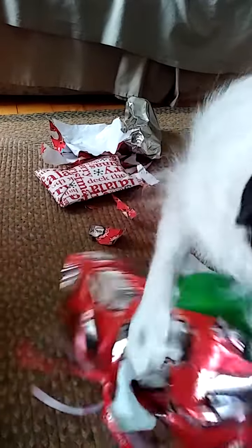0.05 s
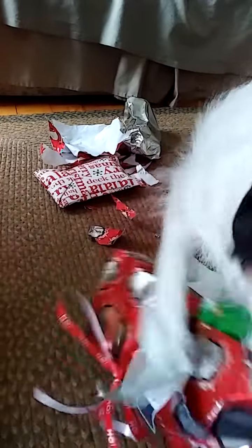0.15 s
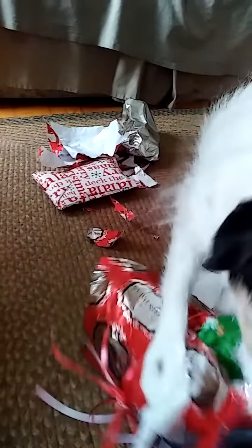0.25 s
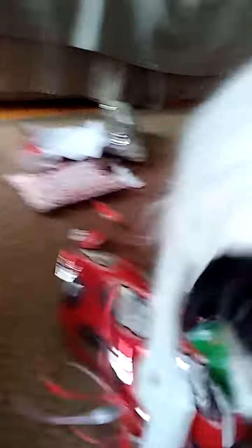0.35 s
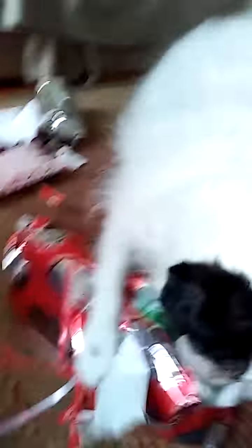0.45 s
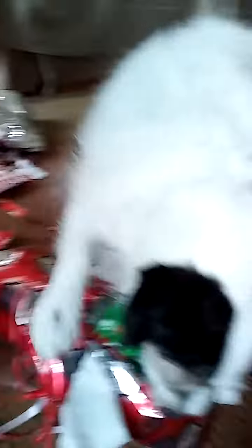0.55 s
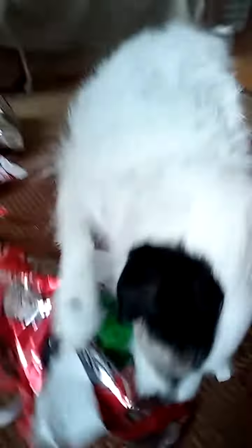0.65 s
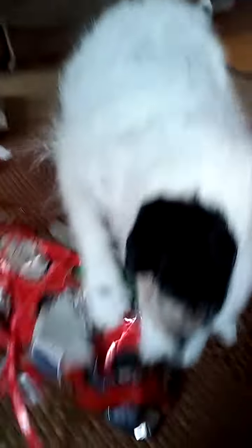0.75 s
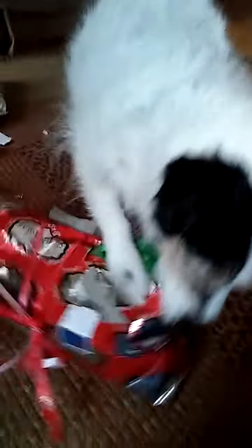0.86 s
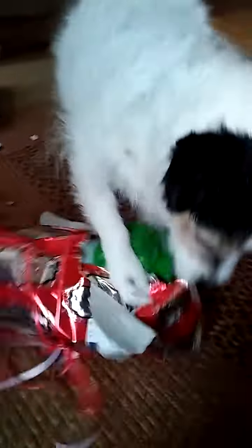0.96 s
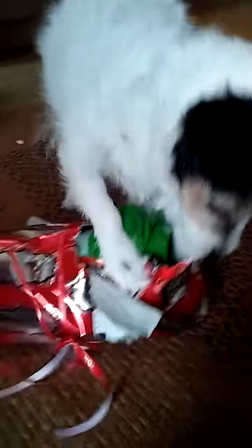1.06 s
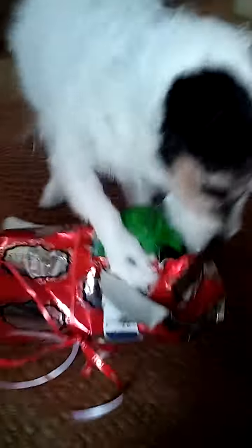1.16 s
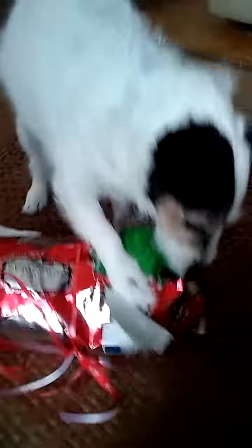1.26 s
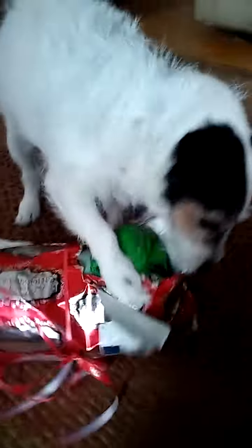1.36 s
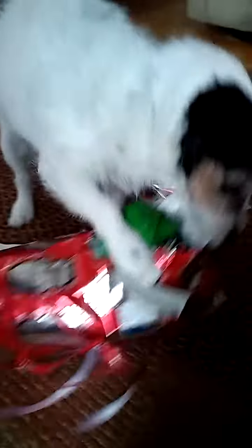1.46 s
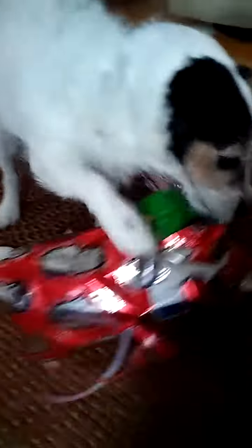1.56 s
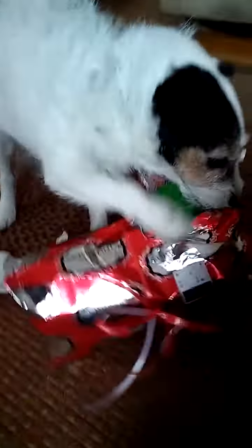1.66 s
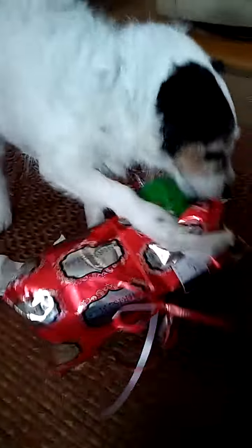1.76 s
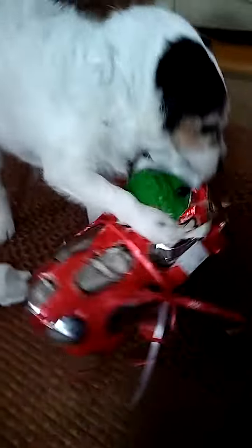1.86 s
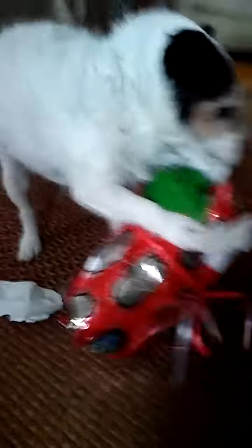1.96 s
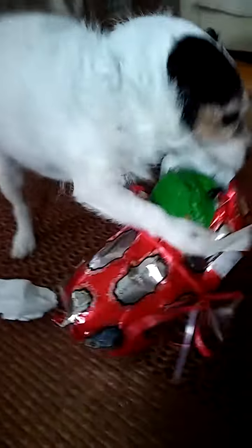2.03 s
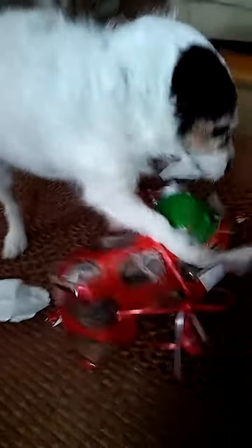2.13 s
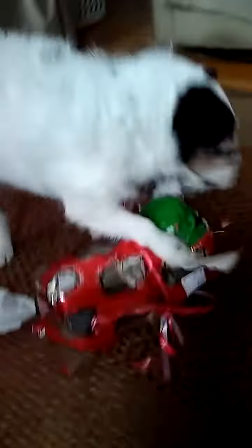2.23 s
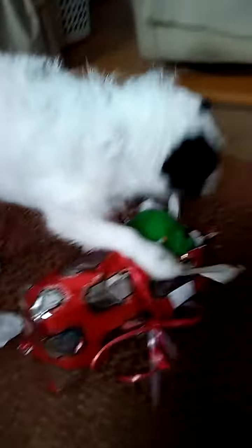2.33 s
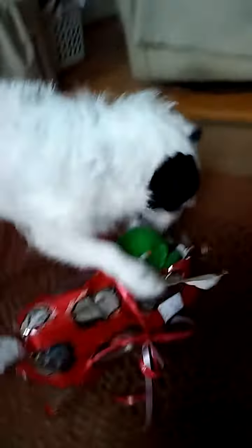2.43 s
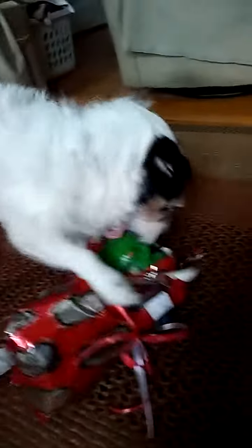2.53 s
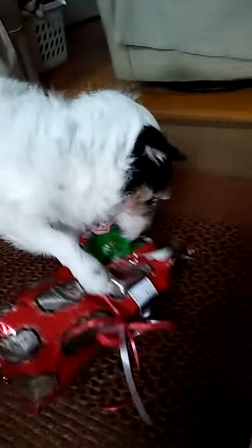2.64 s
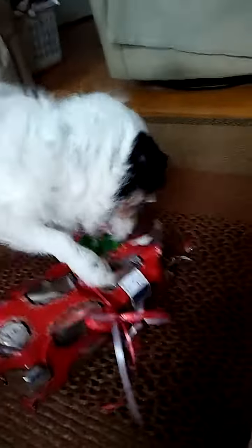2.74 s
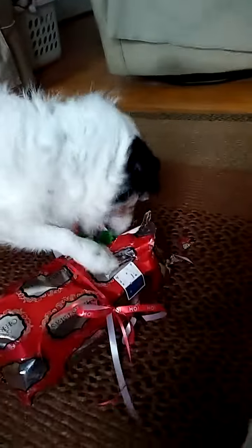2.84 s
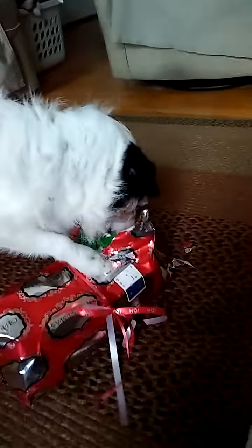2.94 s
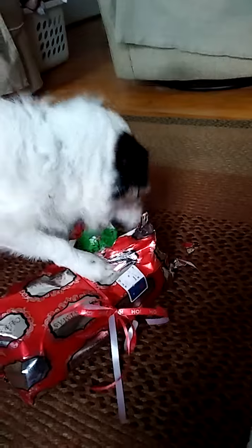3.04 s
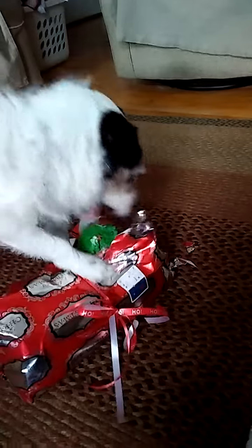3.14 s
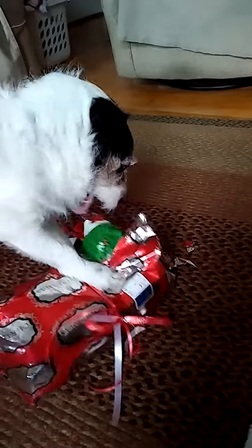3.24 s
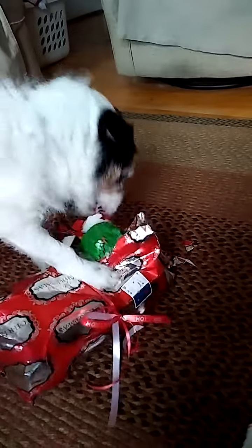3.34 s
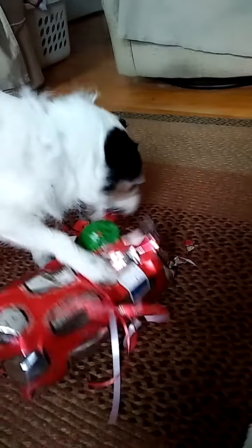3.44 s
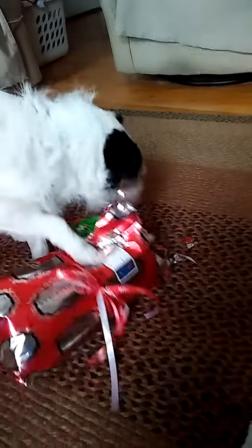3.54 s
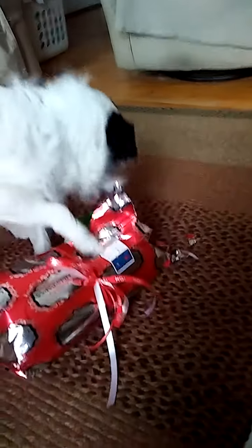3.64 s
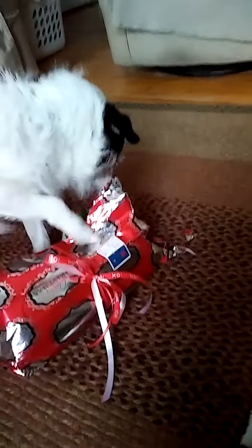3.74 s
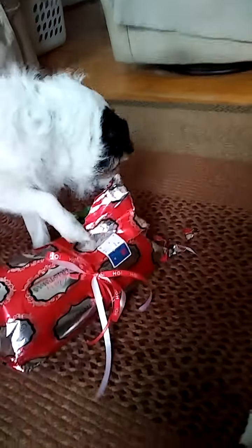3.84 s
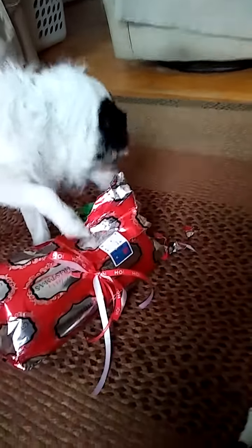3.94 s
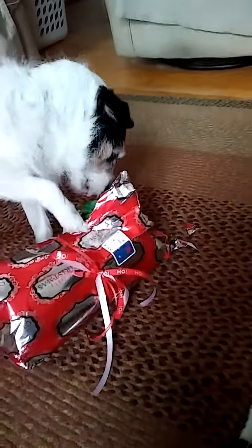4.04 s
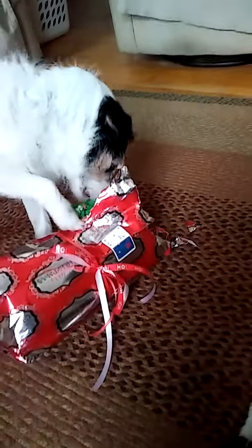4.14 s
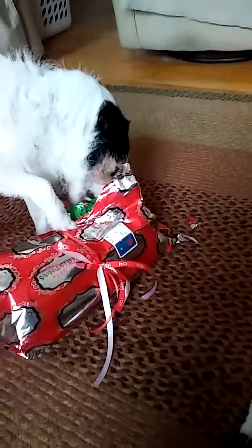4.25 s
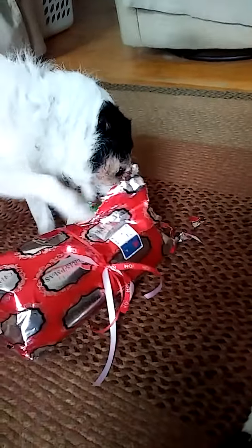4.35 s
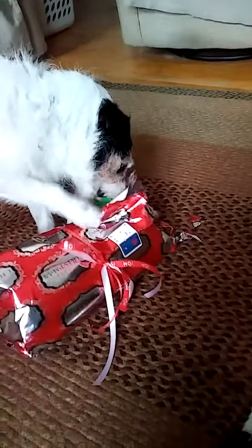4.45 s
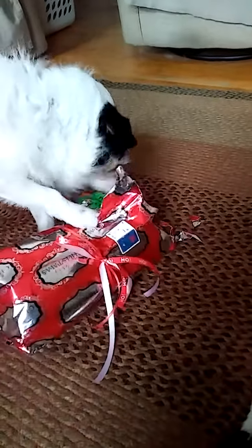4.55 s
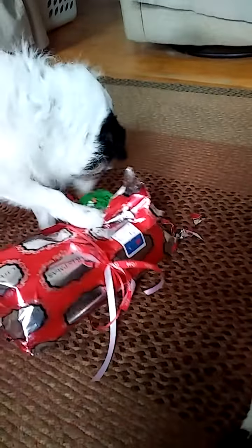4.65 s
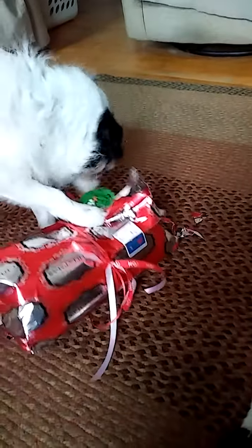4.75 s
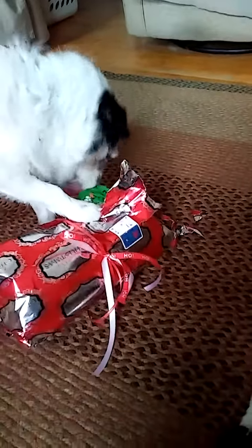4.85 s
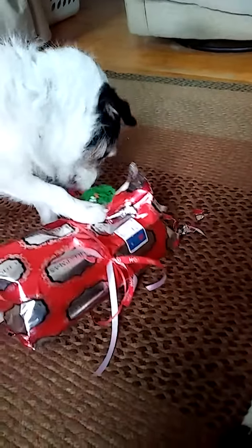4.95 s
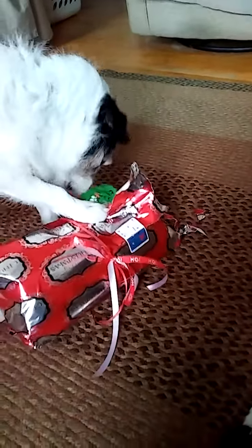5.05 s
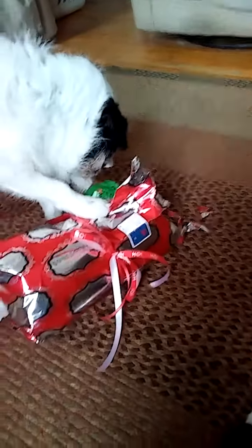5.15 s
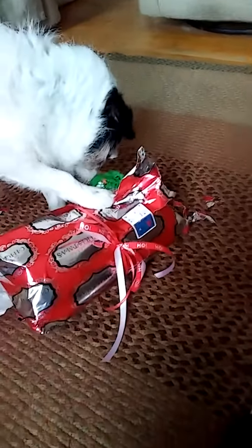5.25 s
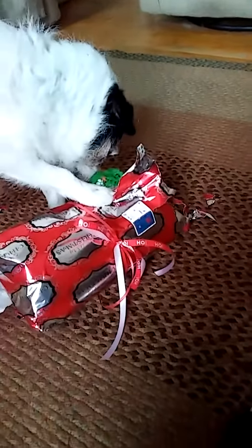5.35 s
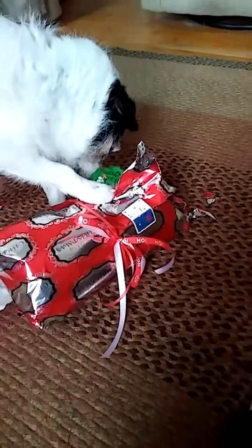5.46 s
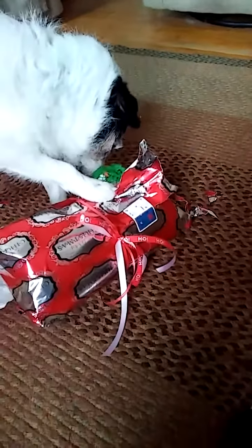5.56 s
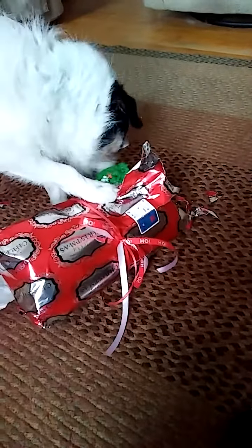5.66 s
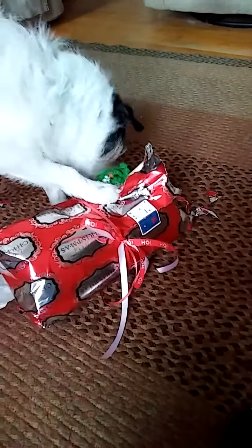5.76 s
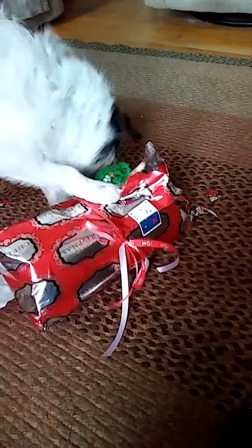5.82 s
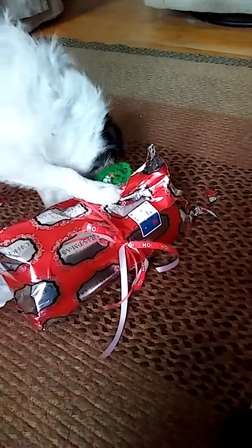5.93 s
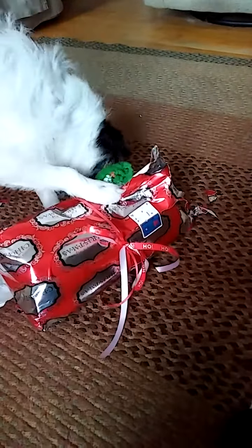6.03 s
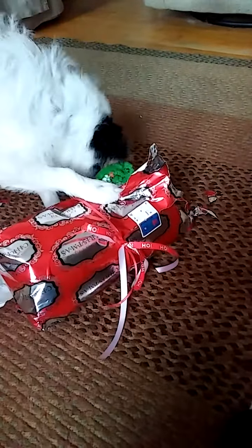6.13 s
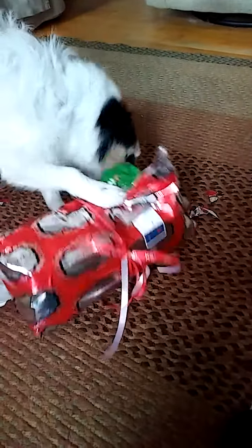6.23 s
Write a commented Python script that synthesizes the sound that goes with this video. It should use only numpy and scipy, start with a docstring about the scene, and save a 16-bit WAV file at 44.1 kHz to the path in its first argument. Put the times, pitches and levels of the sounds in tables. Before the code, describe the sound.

Close by, a small dog pulls at foil wrapping on a carpeted floor. Dense, sharp snaps and crinkles come in quick jerks, loudest in the first half second, with dull paw bumps underneath. Spells thin out, flare again just after two seconds, then give way to small, slightly higher nibbling crackles, faint brushing and quiet gaps. A furnished living room adds a short reverberation over soft air and low hum.

```python
"""Small dog unwrapping a present

A small dog paws and tugs at a present wrapped in foil paper on a living-room carpet, then noses and nibbles.
Creases snap as damped swings over a bed of crinkling, which is random clicks filtered by paper and parcel.
Thuds are decaying floor modes; short strokes and a sliding swish are crackle and noise shaped in time.
A furnished room answers with scatter and decaying echoes; soft mains hum and room air lie beneath.
"""
import sys
import numpy as np
from scipy import signal
from scipy.fft import rfft, irfft, next_fast_len
from scipy.io import wavfile
from scipy.ndimage import uniform_filter1d, minimum_filter1d

SR = 44100
rng = np.random.default_rng(int(sys.argv[2]) if len(sys.argv) > 2 else 0)


def dump_mix(stems):
    """Bounce the given channels to the path in sys.argv[1] as a 16-bit WAV at rate SR."""
    frames = np.atleast_2d(stems).T  # one column per channel
    limited = np.clip(frames, -1, 1)  # hard clip at full scale
    pcm = np.round(limited * 32767).astype(np.int16)
    wavfile.write(sys.argv[1], SR, pcm)


N = 277375

# Dog pawing and tugging at loose sheets; all levels relative:
# start_s, hold_s, level_db, extra_foil_fizz_db, weight_on_parcel_db
PULLS = [(0.0, .125, -24.5, 0, -2), (.158, .13, -28.5, 0.5, -5.5), (.305, .03, -20, 3.5, -15),
         (.345, .05, -27.5, -17, -5.5), (.475, .075, -27, 0.5, 3.5), (.56, .1, -44, -2, -5.5),
         (.67, .22, -43, -4, 4), (.899, .03, -28.5, -10.5, 4.5), (.94, .15, -35.5, -2, 6.5),
         (1.103, .035, -31, -4.5, 2.5), (1.17, .12, -45.5, -0.5, -0.5), (1.305, 0.085, -41.5, -4, 2),
         (1.42, .22, -52.5, 2, 11.5), (1.65, 0.092, -43, 1, 1.5), (1.77, .17, -46.5, -14, -3.5),
         (1.803, .02, -36, -2, 0.5), (1.95, .065, -37, 0, -0.5), (2.02, .1, -36.5, -1.5, 10),
         (2.13, .07, -44, 0.5, 7), (2.195, .068, -23.5, 5.5, 9), (2.3, 0.098, -44, 5.5, -5.5)]
# Dog nibbling a tight corner; all levels relative:
# start_s, hold_s, level_db, extra_foil_fizz_db, weight_on_parcel_db
NIBBLES = [(3.029, 0.029, -44, -5.5, -1.5), (3.113, 0.028, -43.5, 5.5, -14), (3.2, 0.1, -58.5, 2, -8),
           (3.297, 0.049, -45, -8.5, 5.5), (3.47, 0.18, -56, -0.5, -4), (3.6, 0.092, -49.5, -7, 2),
           (3.73, 0.25, -61, 5, -5), (4.578, .058, -39, -3.5, -2), (4.68, 0.031, -65, 1.5, 18),
           (6.198, 0.055, -55.5, -2, 7)]


def from_db(db):
    """Decibels to amplitude gain, twenty to the decade."""
    return 10 ** (np.asarray(db) / 20)


def rms_one(x):
    """Normalise the mean power, so that the rms is 1."""
    return x / np.sqrt(np.mean(x ** 2) + 1e-20)


def at_hz(points, hz):
    """Interpolate a spectrum or decay curve on a logarithmic frequency axis."""
    points = np.array(points)
    return np.interp(np.log(hz), np.log(points[:, 0]), points[:, 1])


def drift(rate):
    """Band-limited chance: random knots, `rate` a second, joined by straight lines; rms 1."""
    knots = rng.standard_normal(4000)
    return rms_one(np.interp(np.arange(N) / SR * rate, np.arange(len(knots)), knots))


def colour(x, spectrum):
    """Minimum-phase filtering: the cepstrum folded to positive times makes the response causal; rms 1."""
    size = next_fast_len(N + 8192, real=True)
    hz = np.maximum(np.fft.rfftfreq(size, 1 / SR), 1)
    octaves_out = np.abs(np.log2(hz / np.clip(hz, spectrum[0][0], spectrum[-1][0])))
    # past its ends the spectrum falls 30 dB an octave, by 50 dB at most
    level_db = at_hz(spectrum, hz) - np.minimum(30 * octaves_out, 50)
    cepstrum = irfft(np.log(from_db(level_db)), size)
    cepstrum[1:size // 2] *= 2
    cepstrum[size // 2 + 1:] = 0
    response = np.exp(rfft(cepstrum))
    return rms_one(irfft(rfft(x, size) * response, size)[:N])


def grains(per_s, spread_db):
    """Impulse noise: tiny buckles of uneven size and random sign at random moments; mean power 1."""
    chance, size = rng.random((2, N), dtype=np.float32)
    clicks = np.zeros(N)
    at = np.flatnonzero(chance < per_s / SR)
    signed = 2 * size[at] - 1
    rarity = -np.log(np.maximum(np.abs(signed), .05))  # large sizes are rare, and bounded
    clicks[at] = np.sign(signed) * from_db(spread_db * rarity)
    return rms_one(clicks)


def background():
    """Stationary noise and harmonics: still room air and mains hum."""
    # room air, relative level: pitch_hz, level_db
    room_tone = [(25, -21), (55, -12.5), (100, -6), (200, -1), (400, -4.5), (700, -8), (1200, -15),
                 (2200, -12), (3200, -16.5), (4500, -25.5), (6500, -25.5), (9000, -27), (12500, -32.5),
                 (15500, -27.5)]
    # sines of the mains hum, rms level: pitch_hz, level_db
    mains_hum = [(60, -78), (120, -74), (180, -83), (300, -76)]
    room_tone_db = -63
    t = np.arange(N) / SR
    hum = sum(from_db(db) * np.sqrt(2) * np.sin(2 * np.pi * (hz * t + rng.random()))
              for hz, db in mains_hum)
    return hum + from_db(room_tone_db) * colour(rng.standard_normal(N), room_tone)


def crackle(broad_share=.65, patchy_db=5.0, patches_per_s=55, count=26):
    """Crackling noise: bands of creases rise and fall independently; some buckles click at all pitches."""
    broad = grains(per_s=420, spread_db=5)
    out = 0
    edges = np.geomspace(300, 16500, count + 1)
    for k, (low, high) in enumerate(zip(edges, edges[1:])):
        activity = from_db(patchy_db * drift(patches_per_s))
        creases = grains(per_s=170 + 0.056 * low, spread_db=3.0) * activity
        limits = [low, high] if k else [40, high]  # the first band also holds the bass
        band = signal.butter(2, limits, "band", fs=SR, output="sos")
        out = out + signal.sosfilt(band, rms_one(creases) + 1e-18)
    return out + broad_share * broad


def spell_gains(spells, scuff_share=0.45):
    """Addition of powers: overlapping spells give the gains of crinkle, fizz, scuff and body."""
    # each pull or nibble builds, sags while held, then dies away
    attack_s, sag_db_per_s, release_db_per_s = 0.0057, 16.5, 259
    power, t = np.zeros((4, N + SR)), np.arange(SR) / SR
    for s, hold_s, level_db, foil_db, weight_db in spells:
        fall_db = sag_db_per_s * t + release_db_per_s * np.maximum(t - hold_s, 0)
        swell = np.minimum(t / attack_s, 1) * from_db(level_db - fall_db)
        # weight on the parcel brings out scuff and body
        layers = from_db([0, foil_db, scuff_share * weight_db, weight_db])
        start = max(int(s * SR), 0)
        power[:, start:start + SR] += np.outer(layers, swell) ** 2
    return np.sqrt(power[:, :N])


def handling(spells, buckles, crinkle_shape, fizz_shape, crinkle_db, fizz_db, scuff_db, body_db):
    """Source and filter: crackle sounds in paper, foil skin, scuffed wrapping and the hollow parcel."""
    # scuffed wrapping, relative level: pitch_hz, level_db
    scuff_shape = [(380, -19), (500, -7), (690, 3.5), (800, 4.5), (1050, 3), (1400, 1.5), (1700, -9.5),
                   (2100, -17.5)]
    # hollow parcel, relative level: pitch_hz, level_db
    body_shape = [(70, -18.5), (130, -10), (185, -.5), (250, 0.5), (310, 3.5), (365, 4), (440, -8.5),
                  (560, -23)]
    shapes = (crinkle_shape, fizz_shape, scuff_shape, body_shape)
    trims = from_db([crinkle_db, fizz_db, scuff_db, body_db])
    return sum(gain * trim * colour(buckles, shape)
               for gain, trim, shape in zip(spell_gains(spells), trims, shapes))


def pop(t, hz, rise_s, phase):
    """Heavily damped oscillation: the envelope builds to height 1 and is gone within a few cycles."""
    u = np.maximum(t, 0) / rise_s
    envelope = (u * np.exp(1 - u)) ** 3
    return envelope * np.sin(2 * np.pi * (hz * t + phase))


def buckle(t, flap_db, flap_hz, edge_db, edge_hz, chance, flap_rise_s=0.00066, edge_rise_s=0.00058,
           rim_hz=6300, rim_db=-10, sheet_hz=950, sheet_db=-25, crack_hz=7500, crack_db=-21,
           crack_rise_s=0.00014, tick_hz=13000, tick_db=-33, tick_rise_s=.00015):
    """Snap-through buckling: flap and sheet swing; the stiff edge rings higher, with a crack and fine tick."""
    flap = pop(t, flap_hz, flap_rise_s, chance[0])
    flap += from_db(sheet_db) * pop(t, sheet_hz, flap_rise_s, chance[1])
    edge = pop(t, edge_hz, edge_rise_s, chance[2])
    edge += from_db(rim_db) * pop(t, rim_hz, edge_rise_s, chance[3])
    edge += from_db(crack_db) * pop(t, crack_hz, crack_rise_s, chance[4])
    edge += from_db(tick_db) * pop(t, tick_hz, tick_rise_s, chance[4])
    return from_db(flap_db) * flap + from_db(edge_db) * edge


def snaps(rows, flap_db=-1, edge_db=-2.5, chain_db=-9, chain_s=.006, lead_s=.0018, hard_pull_db=-16,
          pull_db=4, pitch_scatter=0.2, usual_flap_hz=2250, usual_edge_hz=4900, edge_follows=0.74, count=3):
    """Coupled buckling: weaker neighbours surround each snap, relatively stronger around louder snaps."""
    out = np.zeros(N + 900)
    t = np.arange(900) / SR - .004  # leaves room for neighbours that go first
    for (s, level_db, hz, bright_db), chance in zip(rows, rng.random((len(rows), count + 1, 7))):
        # a stiffer flap has a higher edge
        edge_hz = usual_edge_hz * (hz / usual_flap_hz) ** edge_follows
        flap_level_db, edge_level_db = level_db + flap_db, bright_db + edge_db
        chain = buckle(t, flap_level_db, hz, edge_level_db, edge_hz, chance[0])
        hardness = np.tanh((max(level_db, bright_db) - hard_pull_db) / 10)
        weaker_db = chain_db + pull_db * hardness
        for *phases, late, stiff in chance[1:]:
            delay = chain_s * late - lead_s
            detune = 1 + pitch_scatter * (2 * stiff - 1)
            neighbour = buckle(t - delay, flap_level_db, hz * detune, edge_level_db, edge_hz * detune, phases)
            chain += from_db(weaker_db - 6 * late) * neighbour
        start = int(np.clip((s + t[0]) * SR, 0, N - 1))
        out[start:start + len(t)] += chain
    return out[:N]


def small_snaps(over_db=9.5, idle_db=-58, crowding=.45, scatter_db=1.0, foil_db=-8, loose_hz=2150,
                tight_hz=2650, pitch_scatter=.16, count=330):
    """Activity-driven point process: rows of lesser snaps, louder and denser when the dog is busier."""
    loose, tight = spell_gains(PULLS)[0], spell_gains(NIBBLES)[0]
    busy = from_db(over_db) * (loose + tight) + from_db(idle_db)
    # one random moment in each equal share of the summed activity
    due = np.cumsum(busy ** crowding)
    at = np.searchsorted(due, due[-1] * (np.arange(count) + rng.random(count)) / count)
    size, edge, pitch = np.clip(rng.standard_normal((count, 3)), -2, 2).T
    level_db = 20 * np.log10(busy[at]) + scatter_db * size
    usual_hz = np.where(loose[at] > tight[at], loose_hz, tight_hz)  # the tight corner is higher
    hz = usual_hz * np.exp(pitch_scatter * pitch)
    return list(zip(at / SR, level_db, hz, level_db + foil_db + scatter_db * edge))


def thuds(soft_s=0.0022):
    """Modal decay: paws and parcel make the floor ring, its onset softened by the carpet."""
    # landings, relative level: start_s, level_db
    landings = [(.488, -27.5), (0.519, -28.5), (0.544, -42), (0.69, -33), (0.764, -35.5), (0.802, -27),
                (.91, -44), (1.476, -36), (2.089, -34), (2.27, -43.5)]
    # floor under a paw, relative level and time to fall 60 dB: pitch_hz, level_db, t60_s
    floor_modes = [(58.6, -8, 0.067), (92, -5, 0.098), (134, -1, 0.031)]
    out, t = np.zeros(N + 9000), np.arange(9000) / SR
    detunes = rng.normal(1, 0.087, (len(landings), len(floor_modes)))
    for (s, level_db), detune in zip(landings, detunes):
        ring = 0
        for k, (hz, db, t60) in enumerate(floor_modes):
            decay = from_db(db - 60 * t / t60)
            ring = ring + (-1) ** k * decay * np.sin(2 * np.pi * hz * detune[k] * t)
        start = int(s * SR)
        out[start:start + len(t)] += from_db(level_db) * ring * (1 - np.exp(-t / soft_s))
    return out[:N]


def strokes(buckles, catch_db=3, catches_per_s=200):
    """Stick-slip and resonance: fur and teeth send a short run of crackle into one patch of paper."""
    # paw or muzzle over paper; width is a share of the pitch:
    # centre_s, half_length_s, level_db, pitch_hz, width_ratio
    stroke_rows = [(0.728, 0.014, -52, 1946, 0.32), (.78, .023, -39, 1745, 0.085),
                   (1.778, 0.011, -50, 1854, 0.11), (2.551, 0.02, -57, 1133, 1),
                   (2.747, 0.012, -54.5, 850, 0.85), (4.109, 0.014, -60, 1340, .8),
                   (4.189, 0.0038, -58, 3730, 0.48), (4.278, 0.018, -61.5, 2667, 0.96),
                   (4.375, 0.011, -60.5, 2280, 0.59), (4.496, .004, -52, 2620, 0.65),
                   (4.815, .03, -57, 843, 0.72), (4.887, 0.013, -49, 1900, 1),
                   (5.185, 0.0061, -58.5, 3210, 0.32), (5.34, 0.012, -61, 1680, 1),
                   (5.491, 0.013, -59, 2336, 0.75), (5.667, 0.0096, -53.5, 1596, 0.76),
                   (5.79, .007, -55, 3200, 0.35), (6.098, .02, -55, 2044, 0.52)]
    slips = buckles * from_db(catch_db * drift(catches_per_s))
    out, t = np.zeros(N), np.arange(N) / SR
    for s, half, level_db, hz, width in stroke_rows:
        near = np.abs(t - s) < 4 * half
        b, a = signal.iirpeak(hz, 1 / width, fs=SR)
        patch = signal.lfilter(b, a, signal.lfilter(b, a, slips[near]))
        swell = np.exp(-.5 * ((t[near] - s) / half) ** 2)
        out[near] += from_db(level_db) * rms_one(patch * swell) * np.sqrt(np.mean(swell ** 2))
    return out


def slides():
    """Friction noise: smooth foil gliding over itself gives a short, high swish."""
    # foil over foil: centre_s, half_length_s, level_db
    slide_rows = [(0.851, 0.0071, -37)]
    # swish, relative level: pitch_hz, level_db
    swish_shape = [(2000, -19), (5000, 2.5), (6600, 8), (8000, -0.5), (11000, -13.5), (16000, -23.5)]
    t = np.arange(N) / SR
    swell = sum(from_db(db) * np.exp(-.5 * ((t - s) / half) ** 2) for s, half, db in slide_rows)
    return swell * colour(rng.standard_normal(N), swish_shape)


def room(x, near_db=-11, near_s=0.0044, tail_db=-13, tail_onset_s=0.0041):
    """Reverberation by convolution: scatter off parcel and dog, then the faint ring of a furnished room."""
    # time for the ring to fall 60 dB: pitch_hz, t60_s
    room_t60 = [(150, 0.31), (1000, 0.44), (3000, 0.23), (8000, 0.21), (16000, 0.5)]
    t = np.arange(SR // 2) / SR
    near = rng.standard_normal(len(t)) * np.exp(-t / near_s) * (t > .0008)
    tail, edges = 0, np.geomspace(80, 17000, 9)
    for low, high in zip(edges, edges[1:]):
        band_filter = signal.butter(2, [low, high], "band", fs=SR, output="sos")
        band = signal.sosfilt(band_filter, rng.standard_normal(len(t)))
        tail = tail + band * from_db(-60 * t / at_hz(room_t60, np.sqrt(low * high)))
    tail = tail * (1 - np.exp(-(t / tail_onset_s) ** 2))
    echoes = from_db(near_db) * near / np.linalg.norm(near)
    echoes += from_db(tail_db) * tail / np.linalg.norm(tail)
    return x + signal.fftconvolve(x, echoes)[:N]


def scene():
    """Superposition: the sounds of parcel and dog add and excite the room, over a steady background."""
    # loudest creases, relative levels: start_s, flap_level_db, flap_pitch_hz, edge_level_db
    loud_snaps = [(.0034, -5.5, 2030, -4), (.0097, -19.5, 2112, -5), (.0187, -8.5, 2100, -15),
                  (.042, -3.5, 2215, -20.5), (.0483, -8, 2160, -14.5), (.055, -6, 2470, -8.5),
                  (.0735, -2.5, 2190, -19), (.085, -8, 2110, -13.5), (.106, -10.5, 1960, -22.5),
                  (.12, 0.5, 1919, -13), (.172, -10.5, 2260, -20.5), (.181, -7.5, 2127, -10.5),
                  (.207, -4, 2300, -11.5), (.243, 0.5, 2030, -2), (.247, -3, 2187, -2), (.314, 3, 2050, -3),
                  (.322, 10.5, 2079, 8.5), (.327, -9.5, 2150, -8.5), (.335, -14, 2600, -13),
                  (.351, -13, 2272, 1.5), (.358, -12, 2130, -4), (.3765, 5, 2184, -8),
                  (.381, -5.5, 2150, -3), (.405, -1, 2203, -8), (.411, -14.5, 2200, -8),
                  (.42, -16.5, 2200, -28), (.451, -10, 2188, -8), (.466, -3, 2143, -7.5),
                  (.4883, -5.5, 2327, -3.5), (.517, -5.5, 2280, -2.5), (.523, -9, 2000, -15.5),
                  (.532, -4, 2150, 0), (.541, -1.5, 2046, 1.5), (.6053, -9.5, 2540, -17.5),
                  (.639, -21, 2320, -34.5), (.681, -19, 1800, -30.5), (.7234, -17, 2093, -29),
                  (.8233, -19, 2014, -23.5), (.9072, -8.5, 2230, -14), (.9126, -1, 2170, -8.5),
                  (.924, -5, 2158, -13.5), (.96, -3.5, 2343, -13), (.9744, -9.5, 2200, -22),
                  (1.028, -14.5, 2220, -19), (1.041, -18, 2170, -18), (1.063, -15.5, 2497, -21.5),
                  (1.1143, -6.5, 2507, -22), (1.128, -6.5, 2340, -13), (1.163, -11.5, 2403, -25.5),
                  (1.183, -23, 2570, -22.5), (1.35, -28, 2400, -25), (1.3695, -21, 2114, -27.5),
                  (1.433, -25, 1880, -56), (1.522, -27.5, 1890, -48), (1.667, -23.5, 2598, -28),
                  (1.729, -22.5, 1827, -36), (1.809, -15.5, 2080, -20.5), (1.819, -11.5, 2300, -10.5),
                  (1.9137, -20.5, 2600, -17), (1.936, -20, 2300, -31), (1.9572, -5.5, 2352, -12.5),
                  (2.0305, -46, 2290, -25), (2.063, -19, 2300, -23), (2.149, -28.5, 2350, -28.5),
                  (2.185, -17.5, 1800, -39.5), (2.202, -13.5, 2333, -21), (2.221, -9.5, 2600, 4),
                  (2.269, -3.5, 2410, -7), (2.3, -16, 2400, -12), (2.312, -12.5, 2347, -17),
                  (2.349, -13.5, 2500, -17.5), (2.375, -17, 2330, -39), (2.642, -26, 2770, -35),
                  (3.034, -22.5, 2986, -54.5), (3.041, -26.5, 2890, -45.5), (3.053, -20, 2800, -41),
                  (3.0578, -14, 2500, -49), (3.1161, -11.5, 2720, -17.5), (3.1506, -20, 2260, -35),
                  (3.164, -19.5, 2500, -27.5), (3.2757, -15.5, 2890, -36), (3.311, -17.5, 2495, -41),
                  (3.342, -19.5, 2610, -41), (3.5064, -29, 2700, -42), (3.5815, -28, 2780, -39),
                  (3.593, -25.5, 2610, -38), (3.6227, -19.5, 2650, -25.5), (3.64, -26, 2290, -50),
                  (3.687, -21.5, 2566, -17), (3.786, -23.5, 2686, -32), (3.854, -33, 2500, -47.5),
                  (3.8885, -27, 2460, -55), (3.9556, -34.5, 2960, -48), (4.254, -38, 2490, -62),
                  (4.59, -23.5, 2355, -44), (4.6283, -14, 2604, -17), (4.6516, -23.5, 2810, -10.5),
                  (4.8328, -39, 2680, -44), (6.203, -39.5, 2420, -58.5), (6.219, -29, 3054, -41.5)]
    # crinkle and foil fizz of loose sheets, relative level: pitch_hz, level_db
    crinkle_shape = [(1200, -13), (1650, -2), (2000, 6), (2600, -6), (3100, -7), (3700, -14), (4300, -35)]
    fizz_shape = [(3700, -14), (4400, -13), (4800, -0.5), (5400, -11), (6200, -7), (7000, -14), (8300, -19),
                  (9800, -28), (11500, -43), (16000, -47.5)]
    # crinkle and foil fizz of the tight corner, relative level: pitch_hz, level_db
    corner_crinkle = [(1500, -24), (2050, 11), (2600, 1), (3100, -3), (3800, 0.5), (4800, -24.5)]
    corner_fizz = [(4500, -18), (5400, -4), (6900, 1), (7800, -9.5), (10000, -14.5), (12000, -35),
                   (16000, -41)]
    buckles = crackle()
    tugging = handling(PULLS, buckles, crinkle_shape, fizz_shape,
                       crinkle_db=1.5, fizz_db=-7.0, scuff_db=-4.0, body_db=-9)
    nibbling = handling(NIBBLES, buckles, corner_crinkle, corner_fizz,
                        crinkle_db=3.5, fizz_db=-9, scuff_db=-7.5, body_db=-11.5)
    snapping = snaps(loud_snaps) + snaps(small_snaps(), count=0)  # lesser snaps have no neighbours
    parcel = snapping + tugging + nibbling + strokes(buckles) + slides()
    return (room(parcel + thuds()) + background())[None]


def record(dry, low_cut_hz=40, cutoff_hz=15900):
    """Band limiting and peak limiting: deep bass and top are cut, a fast limiter ducks the loudest peaks."""
    heard = signal.sosfilt(signal.butter(2, low_cut_hz, "high", fs=SR, output="sos"), dry)
    allowed = np.minimum(1, .88 / (np.abs(heard) + 1e-9))
    gain = uniform_filter1d(minimum_filter1d(allowed, size=89), size=89)  # about 2 ms each
    top_cut = signal.ellip(10, .1, 70, cutoff_hz, fs=SR, output="sos")
    return signal.sosfilt(top_cut, gain * heard)


dry = scene()
out = record(dry)
dump_mix(out)
```